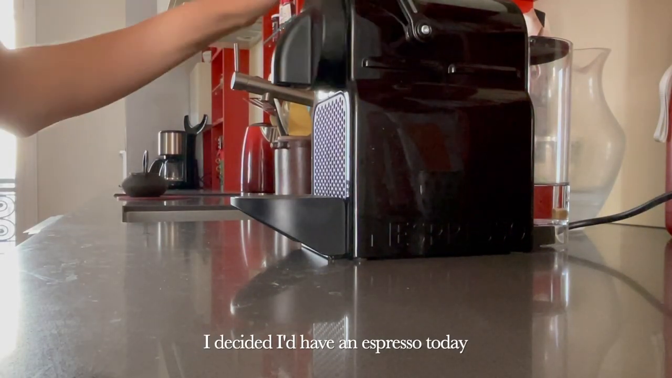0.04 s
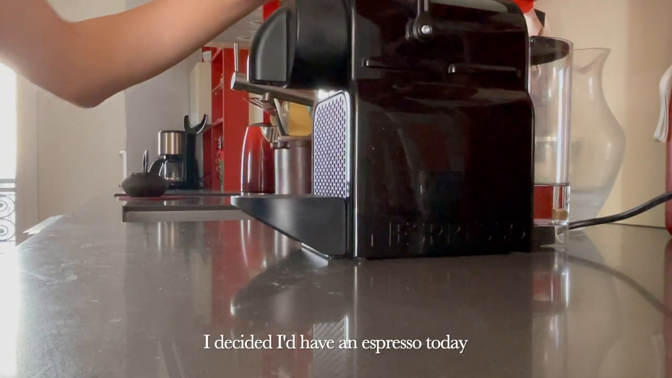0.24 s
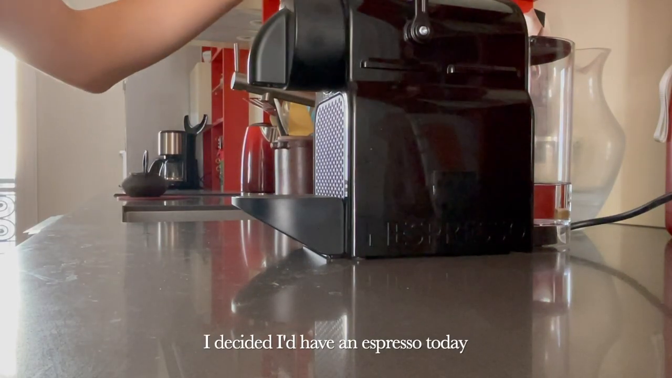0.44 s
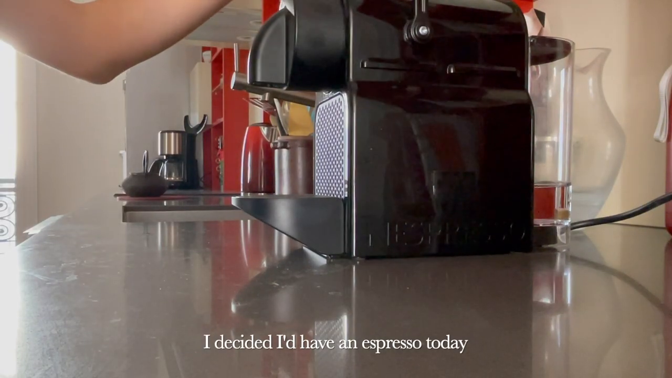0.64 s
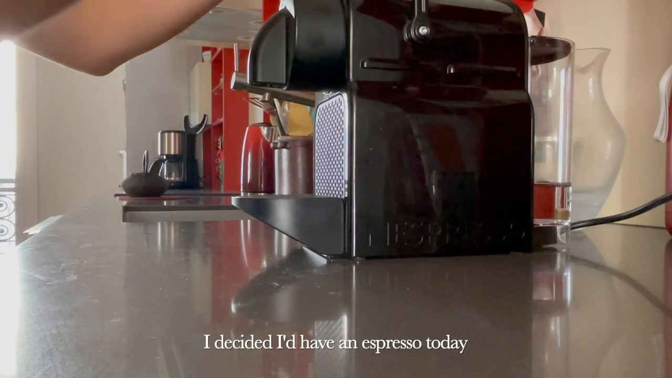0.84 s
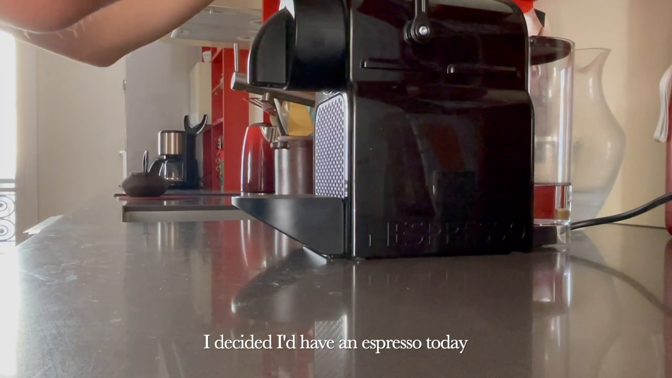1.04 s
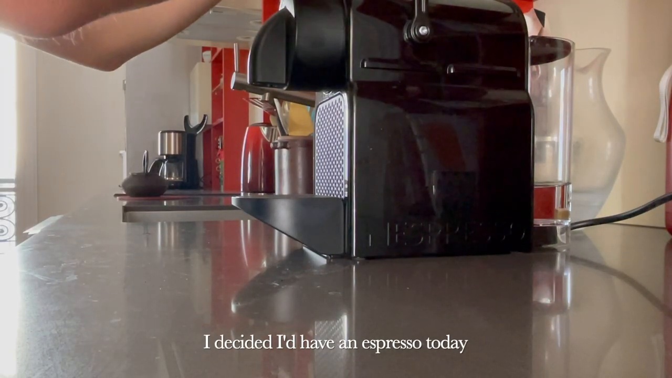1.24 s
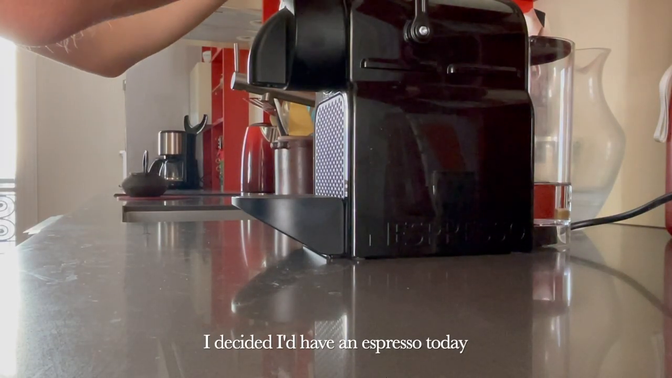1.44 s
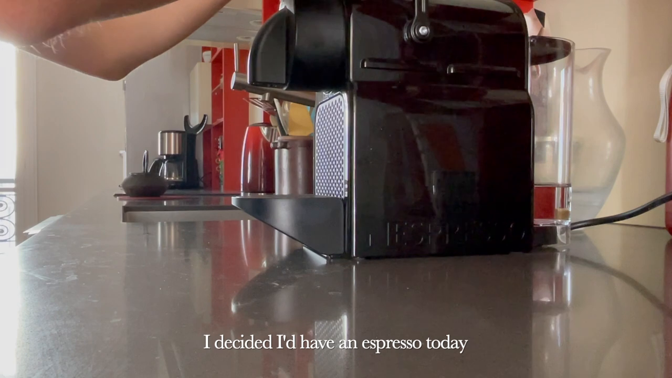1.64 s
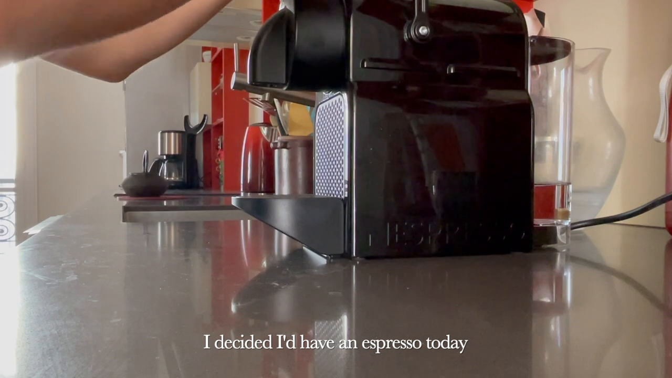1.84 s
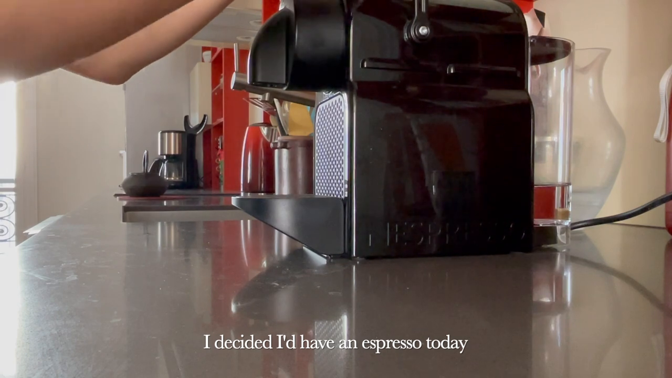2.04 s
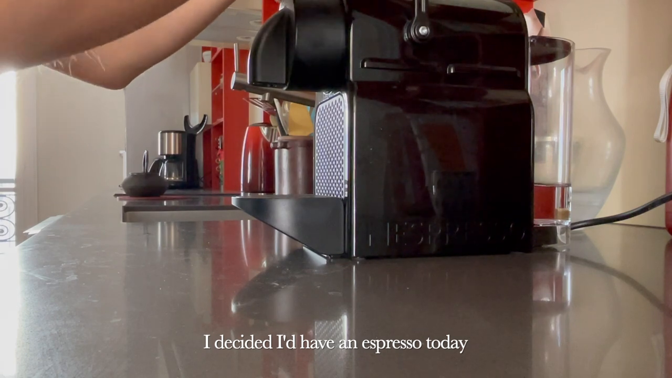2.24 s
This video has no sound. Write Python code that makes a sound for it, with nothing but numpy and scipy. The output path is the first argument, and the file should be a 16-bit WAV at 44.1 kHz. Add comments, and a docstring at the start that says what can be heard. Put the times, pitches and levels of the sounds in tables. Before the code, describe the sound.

Close up on a kitchen counter, a coffee machine's lever rubs, clunks and rocks the housing; after faint ticks, plastic, probably a capsule, knocks and scrapes into its slot, then one soft bump, with short room echo.

```python
"""Capsule coffee machine lever

A capsule coffee machine on a kitchen counter, heard close by. Shaped noise makes its lever slide, then clack and
clunk (noise bursts and fading sines) and rock the machine; loose parts rattle and a hand brushes the housing.
Plastic then taps, scrapes in grainy noise and seats with a knock, probably a capsule going into its slot.
One soft bump follows. A fading noise echo makes the kitchen ring briefly, over a quiet background noise."""
import sys
import numpy as np
from scipy import signal
from scipy.fft import rfft, irfft, next_fast_len
from scipy.io import wavfile
from scipy.ndimage import map_coordinates

SR = 44100
rng = np.random.default_rng(int(sys.argv[2]) if len(sys.argv) > 2 else 0)


def unload_audio(sound):
    """Save the sound as a 16-bit wav file, at the path given as the first command line argument."""
    columns = np.transpose(np.atleast_2d(sound))
    # keep every value between -1 and 1, then stretch to whole-number steps
    steps = np.round(np.clip(columns, -1, 1) * 32767)
    wavfile.write(sys.argv[1], SR, steps.astype(np.int16))


N = 101430  # samples, 2.3 seconds


def amp(db):
    """Turn decibels into a gain."""
    return 10 ** (np.asarray(db) / 20)


def unit(x):
    """Scale a sound to an rms of 1."""
    return x / np.sqrt(np.mean(x ** 2) + 1e-20)


def along(points, hz):
    """Read a curve of (Hz, value) points, joined by straight lines on a log frequency axis."""
    point_hz, values = np.transpose(points)
    return np.interp(np.log(hz + 1), np.log(point_hz + 1), values)


def gains(rows):
    """Make one gain curve over time from each dB column, silent before its first row."""
    seconds, *columns = np.transpose(rows)
    t = np.arange(N) / SR
    started = np.interp(t, seconds, np.ones(len(seconds)), left=0)
    return [started * amp(np.interp(t, seconds, column_db)) for column_db in columns]


def since(start_s):
    """Count the seconds since a moment, zero before it."""
    return np.maximum(np.arange(N) / SR - start_s, 0)


def burst(t, rise, t60, hold=0):
    """Rise in a straight line, stay up until the hold time, then fall by 60 dB every t60 seconds."""
    fall_time = np.maximum(t - max(rise, hold), 0)
    return np.minimum(t / rise, 1) * np.exp(-np.log(1000) * fall_time / t60)


def filtered(x, response):
    """Multiply the spectrum of a sound by a gain that depends on frequency."""
    n = x.shape[-1]
    padded = next_fast_len(n + 8192)
    hz = np.fft.rfftfreq(padded, 1 / SR)
    return irfft(rfft(x, padded) * response(hz), padded)[..., :n]


def spread(pair, side_db):
    """Use two unrelated signals as middle and side, giving a chosen stereo width at each frequency."""
    def middle_and_side_gain(hz):
        angle = np.arctan(amp(along(side_db, hz)))
        return np.array([np.cos(angle), np.sin(angle)])

    mid, side = filtered(pair, middle_and_side_gain)
    return np.array([mid + side, mid - side])


# How wide the noises sound. Each row: frequency in Hz, side level over middle level in dB.
NOISE_WIDTH = [(60, -23), (250, -7.5), (1000, -8.5), (2000, -3), (4000, 0), (6500, 1.5), (10000, 1),
               (15000, -0.5)]
GRAINS_PER_S = 1900  # average number of tiny slips per second


def noise(colour, grainy=0):
    """Coloured stereo noise of rms 1; the grainy share of its power comes as tiny random slips."""
    share = np.clip(grainy, 0, 1)
    slips = (rng.random(N) < GRAINS_PER_S / SR) * rng.standard_normal((2, N))
    smooth = rng.standard_normal((2, N))
    raw = np.sqrt(1 - share) * smooth + np.sqrt(share) * unit(slips)
    coloured = filtered(raw, lambda hz: amp(along(colour, hz)))
    return unit(spread(coloured, NOISE_WIDTH))


def flutter(rate):
    """A smooth random curve with the given number of knots per second."""
    return map_coordinates(rng.standard_normal(N // 32), [np.arange(N) * rate / SR], mode="wrap")


# Colour of the background noise. Each row: frequency in Hz, relative level in dB.
QUIET_COLOUR = [(15, -32.5), (25, -7), (50, 3), (100, -4), (190, -10.5), (260, -18.5), (480, -23.5),
                (1000, -31.5), (2500, -33.5), (6000, -39.5), (16000, -45.5)]
QUIET_DB = -70


def quiet_kitchen():
    """The quiet of the kitchen: steady noise that is strongest in the bass."""
    return amp(QUIET_DB) * noise(QUIET_COLOUR)


# The lever sliding. Each row: time in seconds, level in dB.
SLIDE = [(-.03, -45.5), (.07, -50.5), (.1, -51), (.16, -52.5), (.21, -51), (.3, -65.5), (.45, -105)]
# Colour of the slide. Each row: frequency in Hz, relative level in dB.
SLIDE_COLOUR = [(30, -17), (70, -4.5), (120, 6), (200, -4), (350, 0.5), (700, -7), (1300, -10.5),
                (2300, -12), (5000, -19.5), (7500, -24.5), (11000, -27), (15000, -44)]
SLIDE_WAVER_DB, SLIDE_WAVER_PER_S = 2, 24  # typical unevenness, and its random knots per second


def lever_slide():
    """The lever rubs along a little unevenly: slightly grainy noise with a wavering level."""
    waver = amp(SLIDE_WAVER_DB * flutter(SLIDE_WAVER_PER_S))
    return gains(SLIDE)[0] * waver * noise(SLIDE_COLOUR, grainy=.15)


SQUEAK_HZ, SQUEAK_WIDTH_HZ = 2234, 390  # centre, and distance from it where the gain halves
SQUEAK_START_S, SQUEAK_DB = .145, -58


def lever_squeak():
    """The lever chafes just before its stop: a short burst of noise gathered around one pitch."""
    white = rng.standard_normal((2, N))
    chafe = unit(filtered(white, lambda hz: 1 / (1 + ((hz - SQUEAK_HZ) / SQUEAK_WIDTH_HZ) ** 2)))
    return amp(SQUEAK_DB) * burst(since(SQUEAK_START_S), .015, .15, hold=.04) * chafe


# Colour of the plastic clack. Each row: frequency in Hz, relative level in dB.
CLACK_COLOUR = [(100, -21), (300, -2), (550, 7), (1100, -1.5), (1600, -5.5), (2300, -11), (4000, -19),
                (7000, -36), (16000, -59)]
# Colour of the brighter click. Each row: frequency in Hz, relative level in dB.
CLICK_COLOUR = [(800, -24.5), (2200, -1.5), (4000, -2.5), (6700, 3.5), (8500, -2.5), (11000, -1.5),
                (14000, -12.5), (16000, -30)]
CLACK_T60, CLICK_T60 = 0.048, 0.049  # seconds to fall by 60 dB
CLICK_RISE_SHARE = 0.13  # the click rises in this share of the blow's build-up time
THUD_BELOW_HZ = 280  # modes below this follow the thud level, the others the knock level
MODE_LAG_CYCLES = 0.17  # extra rise time of a mode, in its own cycles
MODE_SCATTER_DB, MODE_DB = 2.27, -4  # typical random change per blow, and gain of all modes
MODE_PHASE_SPREAD = .2  # radians, typical random shift, opposite in left and right


def blows(rows, modes):
    """Each contact gives a click, a dense plastic clack and the part's modes, low ones swelling last."""
    clack, click, out = noise(CLACK_COLOUR), noise(CLICK_COLOUR), np.zeros((2, N))
    t = np.arange(SR // 4) / SR  # each blow sounds for at most a quarter second
    waves = []
    for k, (hz, _, _) in enumerate(modes):
        skew = MODE_PHASE_SPREAD * rng.standard_normal()
        wave = np.sin(2 * np.pi * hz * t + [[skew], [-skew]])
        waves.append((-1) ** k * wave)  # neighbouring modes start in opposite directions
    for start_s, rise, thud_db, knock_db, clack_db, click_db in rows:
        start = round(start_s * SR)
        n = min(len(t), N - start)
        span, u = slice(start, start + n), t[:n]
        out[:, span] += amp(clack_db) * burst(u, rise, CLACK_T60) * clack[:, span]
        click_shape = burst(u, rise * CLICK_RISE_SHARE, CLICK_T60, hold=rise)
        out[:, span] += amp(click_db) * click_shape * click[:, span]
        for (hz, mode_db, t60), wave in zip(modes, waves):
            drive_db = thud_db if hz < THUD_BELOW_HZ else knock_db
            chance_db = MODE_SCATTER_DB * rng.standard_normal()
            level = amp(MODE_DB + drive_db + mode_db + chance_db)
            out[:, span] += level * burst(u, rise + MODE_LAG_CYCLES / hz, t60) * wave[:, :n]
    return out


# Blows of the lever and the hand on the housing. Each row: start in seconds, build-up in seconds,
# then the drive levels of thud, knock, clack and click in dB.
HOUSING_BLOWS = [(.2133, .0085, -19.5, -14.5, -24.5, -45), (.2662, 0.0046, -65, -51.5, -33, -49.5),
                 (.3228, 0.0022, -17.5, -28.5, -28, -43), (.3340, 0.00081, -27, -55, -25.5, -64),
                 (.3442, 0.0012, -33.5, -30, -31.5, -60), (.3585, 0.0025, -25, -66, -40.5, -56.5),
                 (2.1402, 0.0039, -47.5, -66.5, -59, -97), (2.1535, 0.0033, -42, -63, -72, -93),
                 (2.2080, 0.0025, -76, -60, -74, -97)]
# Ringing modes of the housing. Each row: frequency in Hz, relative level in dB, 60 dB fall time in seconds.
HOUSING_MODES = [(98.35, -12.5, 0.44), (117.5, -9, 0.41), (144.3, -2.5, .16), (185, -1.5, .16),
                 (229.5, -2.5, 0.078), (312.5, -4.5, .08), (360.7, -1, 0.14), (423.5, -7, 0.13),
                 (559.4, -4.5, 0.094), (635.8, -12.5, 0.11), (733, -11, 0.12), (1038, -22, .1),
                 (1181, -14, 0.047), (1426, -18.5, .07)]


def housing_blows():
    """The lever clacks and clunks at its stop and the hand bumps, each making the housing ring."""
    return blows(HOUSING_BLOWS, HOUSING_MODES)


# Shoves that rock the machine on its feet. Each row: start in seconds, level in dB.
ROCK_SHOVES = [(0.226, -44), (0.3186, -22), (0.751, -60), (1.139, -52.5), (1.543, -45), (2.15, -48.5)]
ROCK_HZ, ROCK_RISE_S, ROCK_HOLD_S, ROCK_T60 = 64.5, .035, .064, 0.043  # times in seconds
COUNTER_HZ, COUNTER_DB, COUNTER_T60 = 52.8, -17.5, 0.78  # level relative to the feet, fall in seconds


def rocking():
    """The machine rocks for a few cycles on its rubber feet and the counter booms on."""
    out = np.zeros(N)
    for start_s, level_db in ROCK_SHOVES:
        t = since(start_s)
        feet = burst(t, ROCK_RISE_S, ROCK_T60, hold=ROCK_HOLD_S) * np.sin(2 * np.pi * ROCK_HZ * t)
        counter = burst(t, ROCK_HOLD_S, COUNTER_T60) * np.sin(2 * np.pi * COUNTER_HZ * t)
        out += amp(level_db) * (feet + amp(COUNTER_DB) * counter)
    return out


# Loose parts rattling on. Each row: time in seconds, level in dB.
RATTLE_LEVEL = [(.33, -66), (.36, -49.5), (.39, -56), (.42, -54), (.46, -62.5), (.52, -65.5), (.6, -98.5)]
# Colour of the rattle. Each row: frequency in Hz, relative level in dB.
RATTLE_TONE = [(200, -12), (500, 4), (680, 14.5), (1000, -11), (2000, -2), (3200, -9.5), (5000, -9),
               (7000, -25.5), (12000, -27), (16000, -39.5)]


def rattle():
    """Loose parts inside shiver for a moment after the clunk, as grainy noise."""
    return gains(RATTLE_LEVEL)[0] * noise(RATTLE_TONE, grainy=.4)


# The hand brushing the housing. Each row: time in seconds, level in dB.
BRUSH_LEVEL = [(.4, -96), (.5, -79.5), (.56, -75.5), (.64, -71), (.74, -75), (.87, -79.5), (1, -93)]
# Colour of the brushing. Each row: frequency in Hz, relative level in dB.
BRUSH_TONE = [(200, -10.5), (2000, -4.5), (4500, 0), (6800, 3.5), (9500, 0), (12500, -2.5), (16000, -16.5)]


def hand_brush():
    """The hand rubs over the housing: bright, nearly smooth noise."""
    return gains(BRUSH_LEVEL)[0] * noise(BRUSH_TONE, grainy=.05)


# Light ticks of loose plastic. Each row: start in seconds, level in dB, 60 dB fall time in seconds.
TICK_TIMES = [(0.499, -62, 0.092), (0.51, -62.5, 0.039), (.711, -62, 0.032), (.7612, -59.5, 0.019),
              (.793, -74.5, 0.021), (1.3228, -73.5, 0.026), (1.461, -71, 0.038)]
# Colour of the ticks. Each row: frequency in Hz, relative level in dB.
TICK_COLOUR = [(500, -25.5), (2000, -17.5), (3600, 3.5), (7000, 3), (12000, 5.5), (16000, -14.5)]


def ticks():
    """Small bright noise ticks, too light to ring the housing."""
    shape = sum(amp(level_db) * burst(since(start_s), 0.0008, t60) for start_s, level_db, t60 in TICK_TIMES)
    return noise(TICK_COLOUR) * shape


# Knocks of the capsule in its slot. Each row: start in seconds, build-up in seconds,
# then the drive levels of thud, knock, clack and click in dB.
SLOT_BLOWS = [(1.1370, 0.0058, -41, -46, -45.5, -70.5), (1.1792, .002, -54, -43, -37.5, -66.5),
              (1.2318, 0.0011, -72, -47.5, -58.5, -72.5), (1.3015, 0.0054, -47, -39.5, -41.5, -57.5),
              (1.3385, 0.00096, -58, -49, -52, -63), (1.4935, .001, -64, -39, -59, -48),
              (1.5262, .002, -44, -40.5, -39, -46.5), (1.5380, 0.0035, -51, -33.5, -37.5, -48.5),
              (1.5495, 0.0067, -29.5, -50.5, -55.5, -61)]
# Ringing modes of the slot. Each row: frequency in Hz, relative level in dB, 60 dB fall time in seconds.
SLOT_MODES = [(117, -2, 0.1), (185.4, 1.5, 0.15), (249, -14, 0.033), (396, 0, 0.044), (472.7, -4, 0.13),
              (498.5, -1.5, .11), (638.3, -10.5, 0.3), (731, -5.5, 0.085), (926.5, -2, 0.048),
              (1106, -4.5, 0.037), (1434, -27, 0.054), (2221, -8, 0.023), (3800, -20, 0.028),
              (6900, -19.5, 0.034)]


def capsule_knocks():
    """The capsule taps and seats in its slot, and each knock makes the slot ring."""
    return blows(SLOT_BLOWS, SLOT_MODES)


# Plastic scraping in the slot. Each row: time in seconds, body level in dB, treble level in dB.
SCRAPE_LEVELS = [(1.17, -57, -89.5), (1.222, -67, -70), (1.24, -51.5, -70.5), (1.29, -52.5, -66),
                 (1.33, -49.5, -69), (1.36, -54.5, -82), (1.385, -44.5, -53), (1.405, -62.5, -72),
                 (1.44, -50.5, -71.5), (1.47, -54, -55.5), (1.485, -53, -64), (1.52, -57.5, -59),
                 (1.56, -55.5, -75), (1.61, -83, -66), (1.7, -96, -92.5)]
# Colour of the scrape's body. Each row: frequency in Hz, relative level in dB.
SCRAPE_BODY = [(60, -5), (150, -2.5), (280, -6), (480, -6), (800, -3), (1200, -2), (1600, -5.5),
               (2500, -16), (4000, -26), (9000, -48)]
# Colour of the scrape's treble. Each row: frequency in Hz, relative level in dB.
SCRAPE_BRIGHT = [(1200, -17.5), (3000, -4), (7000, 0.5), (8500, 2.5), (10000, -9), (13000, -13),
                 (16000, -19.5)]
SCRAPE_RING_DB, SCRAPE_RING_HZ = 5, 28.2  # boost at each slot mode, and its half-width
CONTACT_FLUTTER_DB, FLUTTER_PER_S = 1.5, 100  # typical unevenness, and its random knots per second


def scrape():
    """Plastic catches and slips unevenly: grainy noise, its body boosted at the modes of the slot."""
    def slot_boost(f):
        peaks = sum(1 / (1 + ((f - hz) / SCRAPE_RING_HZ) ** 2) for hz, _, _ in SLOT_MODES)
        return amp(SCRAPE_RING_DB * peaks)

    body_gain, treble_gain = gains(SCRAPE_LEVELS)
    body = body_gain * unit(filtered(noise(SCRAPE_BODY, grainy=0.32), slot_boost))
    treble = treble_gain * noise(SCRAPE_BRIGHT, grainy=0.22)
    return (body + treble) * amp(CONTACT_FLUTTER_DB * flutter(FLUTTER_PER_S))


# The fingertip's dull pat with the last bump. Each row: time in seconds, level in dB.
PAT_LEVEL = [(2.138, -59), (2.143, -52.5), (2.151, -53.5), (2.157, -46.5), (2.166, -52.5), (2.18, -69),
             (2.21, -82), (2.25, -100)]
# Colour of the pat. Each row: frequency in Hz, relative level in dB.
PAT_TONE = [(100, -21), (300, 7.5), (550, 5), (780, 0.5), (1000, 1), (1300, -10), (2000, -15),
            (2900, -21.5), (4000, -35), (8000, -55)]


def pat():
    """A soft, muffled touch: noise with almost no treble."""
    return gains(PAT_LEVEL)[0] * noise(PAT_TONE)


# Fingers shifting on the housing. Each row: time in seconds, level in dB.
GRIP_LEVEL = [(2.17, -93), (2.24, -75), (2.3, -62.5)]
# Colour of the shifting fingers. Each row: frequency in Hz, relative level in dB.
GRIP_TONE = [(25, -3), (50, 10.5), (120, -1.5), (250, -3), (700, -21), (2500, -32.5), (10000, -44.5)]


def finger_shift():
    """Fingers shift on the housing: a low noise that swells to the end."""
    return gains(GRIP_LEVEL)[0] * noise(GRIP_TONE)


# How wide the echo sounds. Each row: frequency in Hz, side level over middle level in dB.
ECHO_WIDTH = [(60, -13.5), (200, -7.5), (500, -5), (1200, 1.5), (10000, -2.5)]
# How long the echo lasts. Each row: frequency in Hz, 60 dB fall time in seconds.
ECHO_T60 = [(60, 0.26), (200, 0.68), (600, .58), (2000, 0.63), (5000, 0.17), (12000, 0.31)]
# How strong the echo is. Each row: frequency in Hz, level in dB.
ECHO_DB = [(60, -9), (180, -13), (360, -14), (700, -8.5), (2000, -10), (5000, -9), (12000, -19)]
ECHO_ONSET_S = 0.004


def kitchen_echo(x):
    """The room answers with a diffuse noise tail in which each frequency dies at its own speed."""
    hz, t, tiles = signal.stft(rng.standard_normal((2, SR)), SR, nperseg=256)
    fade = amp(-60 * t / along(ECHO_T60, hz)[:, None]) * np.minimum(t / ECHO_ONSET_S, 1)
    # give each frequency the same energy before its own level is set
    fade = fade / np.sqrt(np.mean(fade ** 2, axis=1, keepdims=True) * SR)
    level = amp(along(ECHO_DB, hz))[:, None]
    tail = signal.istft(tiles * fade * level, SR, nperseg=256)[1]
    echo = signal.fftconvolve(x, tail, axes=1)[:, :N]
    return spread(echo, ECHO_WIDTH)


def scene():
    """Add up the machine and the hand, their echo and the quiet of the kitchen."""
    machine = lever_slide() + lever_squeak() + housing_blows() + rocking() + rattle() + ticks()
    machine = machine + capsule_knocks() + scrape()
    hand = hand_brush() + pat() + finger_shift()
    direct = machine + hand
    return direct + kitchen_echo(direct) + quiet_kitchen()


# Left-right balance of the sound. Each row: frequency in Hz, left gain in dB (the right gets the opposite).
LEAN = [(60, 0), (130, -1), (300, .5), (2000, 0.33), (4500, 1.47), (9000, 0)]
MID_DIP_HZ, SIDE_DIP_HZ, DIP_WIDTH_HZ, DIP_DB = 8220, 11800, 750, -15
TOP_HZ = 16000  # nothing passes from here up


def record(dry):
    """The stereo sound gets a treble dip in its sum and one in its difference, a slight lean and no top."""
    def dip(hz, centre):
        return amp(DIP_DB * np.exp(-((hz - centre) / DIP_WIDTH_HZ) ** 2))

    def lean_and_limit(hz):
        return amp(np.outer([1, -1], along(LEAN, hz))) * (hz < TOP_HZ)

    mid = filtered((dry[0] + dry[1]) / 2, lambda hz: dip(hz, MID_DIP_HZ))
    side = filtered((dry[0] - dry[1]) / 2, lambda hz: dip(hz, SIDE_DIP_HZ))
    return filtered(np.array([mid + side, mid - side]), lean_and_limit)


dry = scene()
out = record(dry)
unload_audio(out)
```